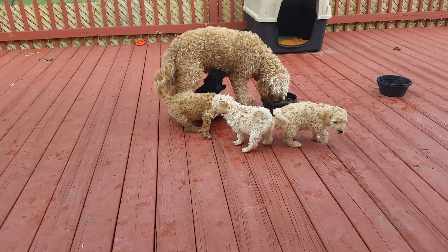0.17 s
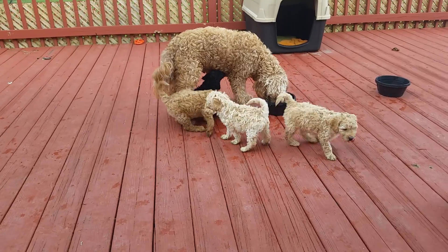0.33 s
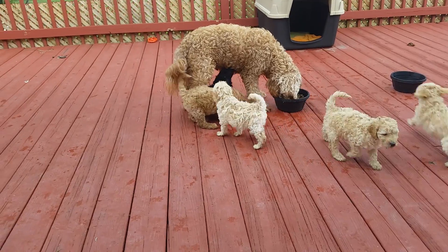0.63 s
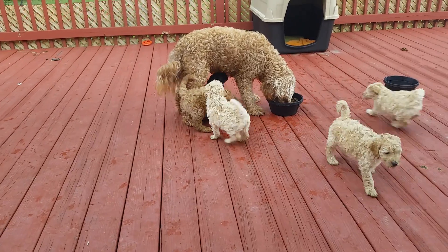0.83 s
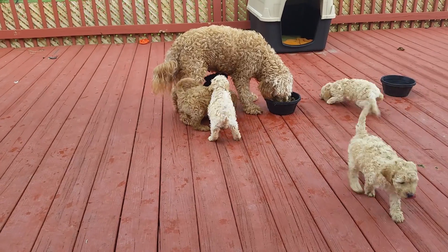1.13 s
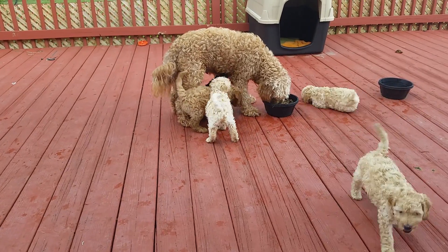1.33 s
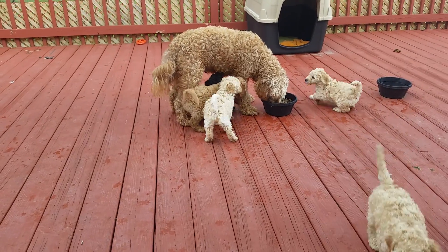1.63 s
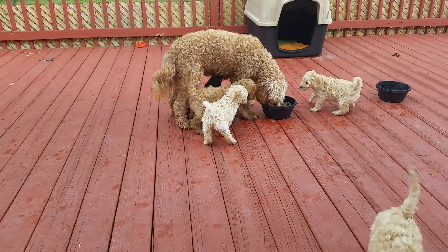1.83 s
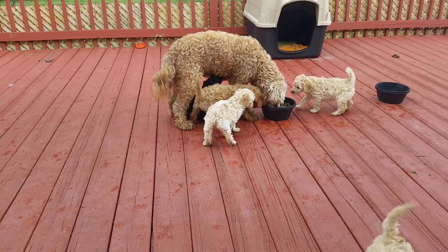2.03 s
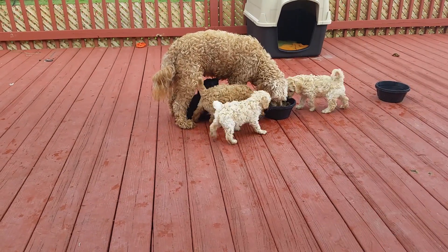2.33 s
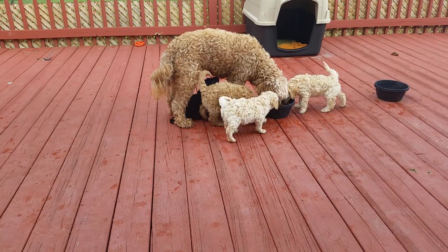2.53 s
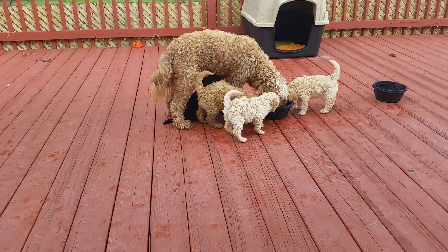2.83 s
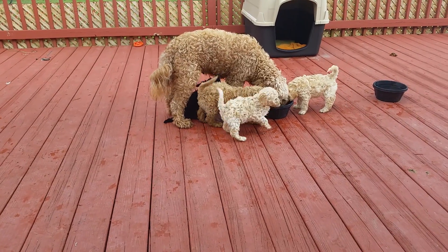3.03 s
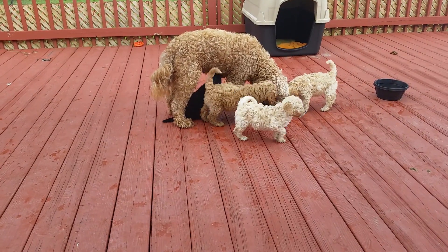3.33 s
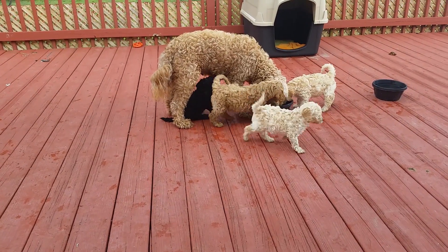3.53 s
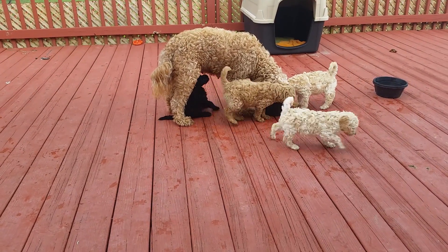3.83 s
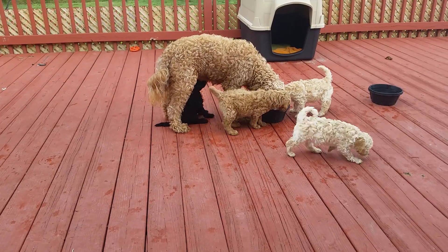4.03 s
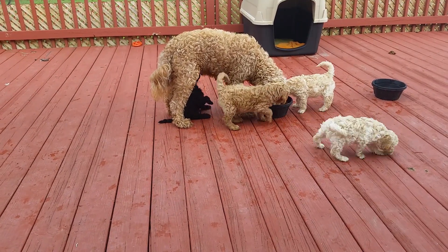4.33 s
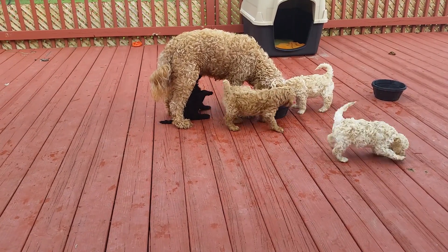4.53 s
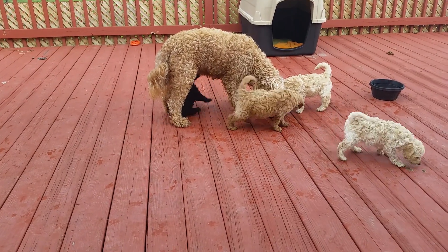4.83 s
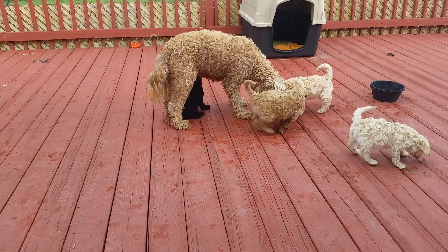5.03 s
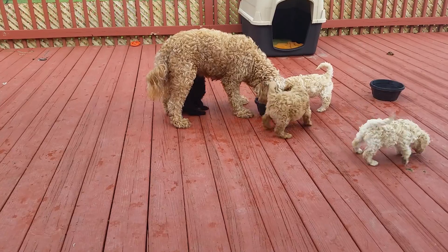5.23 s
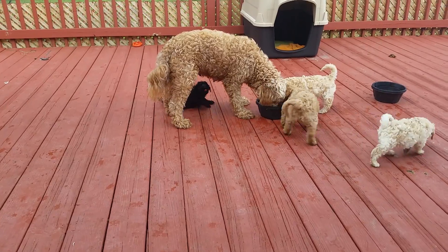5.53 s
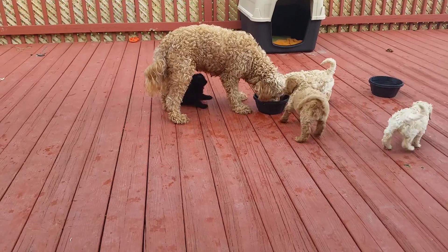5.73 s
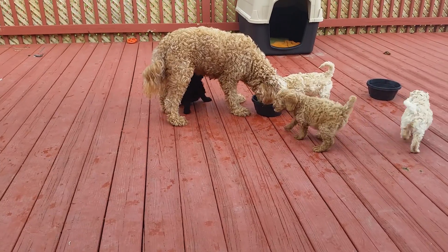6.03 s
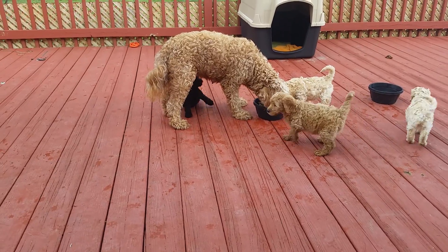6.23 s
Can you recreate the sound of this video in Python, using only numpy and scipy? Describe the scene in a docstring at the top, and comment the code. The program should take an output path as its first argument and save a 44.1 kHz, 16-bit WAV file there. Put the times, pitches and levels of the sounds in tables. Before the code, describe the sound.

Outdoors on a wooden deck, a litter jostles at a food bowl. Thin whistled squeaks, faint whimpers and dry clicks of claws and food come first, then one short raspy yelp midway. After a pause comes a louder, piercing double yelp, followed by soft hollow paw thumps and scuffs. A low lumpy rumble and faint hiss continue throughout. Stereo microphone nearby, right side duller, with light yard echoes.

```python
"""On a wooden deck outdoors, close to a food bowl, puppies jostle round their mother before a two-port microphone.
Sharp yelps and fainter whimpers are harmonic stacks shaped by throat and mouth; thin squeaks are near-pure whistles.
Paws ring the board modes, claws and food click in bursts of noise, and scuffs are swelling bands of grit.
Filtered noise makes the low outdoor rumble and faint hiss; far birds and one faint whine are smeared, gliding tones.
Echoes and a short scatter place the puppies' voices in the yard."""
import sys
import numpy as np
from scipy import signal
from scipy.fft import rfft, irfft
from scipy.io import wavfile
from scipy.ndimage import map_coordinates

SR = 44100
rng = np.random.default_rng(int(sys.argv[2]) if len(sys.argv) > 2 else 0)


def unload_wav(signal):
    """Save mono or channel-first audio to the path in sys.argv[1] as 16-bit WAV at rate SR, clipped to [-1, 1]."""
    wavfile.write(
        sys.argv[1],
        SR,
        np.round(np.clip(np.atleast_2d(signal).T, -1, 1) * 32767).astype(np.int16),
    )


N = 281700
TIME = np.arange(N) / SR   # s
FREQS = np.maximum(np.arange(N // 2 + 1) * SR / N, 1)   # Hz

# All levels below are relative; each source sets its own final trim.
# Low outdoor noise over time. Each row: time in seconds, level in dB.
RUMBLE_LEVEL = [(.25, -43.5), (.4, -45.5), (.9, -45), (2.9, -45), (3.9, -47), (4.55, -47), (4.8, -45),
                (5.3, -44), (6.39, -45)]
# Treble of the open air over time. Each row: time in seconds, hiss level in dB, top fizz level in dB.
TREBLE_LEVELS = [(0.1, -87.5, -87), (0.27, -63.5, -72.5), (0.5, -72, -77.5), (1.43, -76.5, -85),
                 (1.62, -77, -77), (2.52, -71, -78), (2.69, -76.5, -75.5), (3.3, -69.5, -75),
                 (3.72, -80, -84), (4.11, -70, -76.5), (4.36, -88.5, -88), (4.67, -89.5, -84),
                 (4.79, -70.5, -70.5), (5.37, -75, -79), (5.69, -66, -69), (6.11, -74.5, -75),
                 (6.32, -66.5, -64.5), (6.39, -63, -61.5)]
# Spectrum of the air in bass and middle. Each row: frequency in Hz, level in dB.
AIR_SPECTRUM = [(15, -43.5), (25, -15.5), (53, -1), (116, -3.5), (361, -15.5), (513, -20), (637, -21),
                (691, -20), (1930, -28.5), (2260, -26.5), (2970, -32), (4450, -30), (5670, -45),
                (7830, -32.5), (15800, -37)]
# Spectrum of the hiss. Each row: frequency in Hz, level in dB.
HISS_SPECTRUM = [(1760, -37), (3000, -0.5), (3450, -1.5), (3620, -6), (3930, -7), (4430, 0.5), (5650, -9.5),
                 (6400, -9), (7830, -3), (9060, -8), (13100, -2.5), (15200, -4), (15800, -31)]
# Likeness of the noise at the two ports. Each row: frequency in Hz, correlation from 0 to 1.
PORT_LIKENESS = [(60, 0.95), (130, 0.97), (290, 0.79), (640, 0.11), (1400, 0.021), (12000, 0.14)]
# Soft whimpers. Each row: start in seconds, length in seconds, start, middle and end pitch in Hz,
# level in dB, brightness in dB, mouth resonance in Hz, roughness (0 is steady).
WHIMPERS = [(0.071, 0.08, 905, 1017, 948, -50, 7.5, 1550, 0.42),
            (0.499, 0.051, 777, 818, 876, -56.5, 3, 1700, 0.3),
            (2.812, .085, 1037, 917, 840, -54.5, -3.5, 1000, 0.3),
            (2.944, .135, 837, 885, 718, -47, -15, 920, 0.11)]
# Three loud yelps, one curve each. Each row: time in seconds, pitch in Hz, level in dB,
# brightness in dB, mouth resonance in Hz, roughness (0 is steady).
YELPS = [
    [(3.323, 1018, -47, 6, 2000, 1), (3.331, 925, -37.5, 2.5, 2100, 0.48), (3.345, 963, -28, -5.5, 2300, 0),
     (3.36, 995, -34.5, 10.5, 2220, .45), (3.375, 1066, -19.5, -8.5, 2100, 0),
     (3.386, 1045, -31, 5.5, 2070, 0.36), (3.396, 983, -27.5, 2, 970, 0.58),
     (3.403, 922, -30.5, 3.5, 1830, 0.57), (3.416, 873, -45, 5, 1570, 1.2)],
    [(4.604, 1327, -26.5, -21, 1300, 0.25), (4.613, 1054, -38, -14, 1900, 0),
     (4.63, 1043, -28.5, 1.5, 4350, 0), (4.643, 1078, -27, -5, 1900, 0.03),
     (4.651, 1249, -15, -7.5, 1400, 0.05), (4.66, 1319, -12.5, -13, 1330, 0.08),
     (4.678, 1305, -23, -5, 1300, 0.26), (4.685, 1228, -33.5, -1.5, 1300, .73),
     (4.71, 1110, -33.5, -5.5, 1300, .8)],
    [(4.725, 1008, -32.5, -3, 3930, 0), (4.733, 982, -33.5, 8.5, 3770, 0.1),
     (4.762, 990, -31.5, 7, 4240, 0.17), (4.776, 1036, -23.5, 2, 2600, 0.05),
     (4.79, 1019, -32, -8, 2200, .15), (4.808, 1064, -25, -2.5, 1260, 0), (4.83, 1009, -37, -4, 1100, .28),
     (4.84, 900, -42, -15, 1260, 0.7), (4.862, 713, -48, -13, 1500, 0)],
]
# Throat colour of the cries. Each row: frequency in Hz, gain in dB.
THROAT = [(600, 3.5), (1000, -1.5), (1350, -2), (2050, -2), (2600, -11.5), (3350, -8), (3950, 0.5),
          (4600, -6), (5150, -10), (5600, -12), (6200, -14), (7000, -21), (7500, -28.5), (9500, -59.5),
          (12500, -28), (16000, -50)]
# House wall, kennel and fence. Each row: delay in seconds, level in dB.
ECHOES = [(0.0189, -4.5), (.034, -14), (.047, -21.5)]
# Cries from the bowl as they reach the right port. Each row: frequency in Hz, gain in dB.
CRY_RIGHT = [(1000, -3.5), (1300, 4), (1600, 1.5), (2000, 0), (3000, -4), (4000, -1), (6000, -7), (9000, 3)]
# Clearest clicks of claws and food. Each row: start in seconds, level in dB, centre in Hz.
CLICKS = [(.227, -47, 1960), (.2834, -46, 4080), (.3503, -39, 1890), (.646, -44, 1600), (.729, -41.5, 1280),
          (.7498, -47, 4300), (.8782, -45, 1400), (2.0348, -51.5, 4200), (2.1994, -48.5, 1300),
          (2.2854, -41, 3500), (2.2986, -47, 3550), (2.532, -42, 1250), (2.602, -55, 12000),
          (2.6095, -41, 1400), (2.6803, -50, 9900), (3.7357, -47.5, 1780), (4.272, -47.5, 1200),
          (5.0002, -44, 1180), (5.8592, -52, 1300), (6.0858, -40, 1500), (6.2654, -62, 11000)]
# Paws and fur brushing the boards. Each row: start in seconds, length in seconds, centre in Hz, level in dB.
SCUFFS = [(0.243, 0.055, 3000, -40), (0.621, 0.11, 1830, -47.5), (1.795, 0.095, 2670, -49),
          (2.436, 0.085, 3330, -47), (2.273, .038, 6650, -62), (2.862, 0.064, 12500, -52),
          (2.877, 0.052, 3200, -43), (3.072, .063, 3670, -50.5), (4.082, 0.051, 3130, -50.5),
          (5.045, .059, 395, -36.5), (5.169, 0.06, 565, -37.5), (5.596, 0.064, 880, -46.5),
          (5.656, 0.044, 3570, -48)]
# Whistled squeaks. Each row: start in seconds, length in seconds, start, middle and end pitch in Hz,
# level in dB.
SQUEAKS = [(0.321, 0.081, 2550, 2860, 2800, -45.5), (.515, 0.053, 1675, 1682, 1650, -39),
           (.765, 0.047, 2640, 2760, 2920, -56), (0.829, 0.055, 2314, 2530, 2830, -42.5),
           (0.883, 0.034, 2720, 2580, 2270, -42.5), (.95, 0.059, 2310, 2298, 2205, -45),
           (1.02, 0.09, 2240, 2140, 2140, -53), (1.21, 0.067, 3800, 3680, 3620, -53.5),
           (1.676, 0.058, 2970, 2910, 2780, -49), (1.706, 0.031, 2920, 2370, 2220, -47.5),
           (1.742, 0.069, 2130, 2050, 2100, -47), (1.801, 0.03, 2190, 2430, 2400, -43),
           (2.196, .045, 2830, 3370, 2950, -49.5), (2.25, 0.035, 2870, 3180, 3650, -45.5),
           (2.29, 0.14, 2720, 2443, 2205, -44.5), (2.418, 0.0407, 2390, 2506, 2200, -47.5),
           (4.86, 0.046, 2760, 2846, 2760, -39.5), (5.285, 0.039, 3680, 3600, 3530, -47.5),
           (5.346, 0.056, 2740, 2640, 2340, -54)]
# Paws landing on the boards. Each row: start in seconds, boom level in dB, knock level in dB.
PAWS = [(.352, -29.5, -38.5), (.378, -33.5, -52), (0.84, -47, -59), (4.999, -38, -33), (5.081, -33, -58),
        (5.131, -34.5, -30.5), (5.205, -36, -59), (5.331, -34.5, -45.5), (5.366, -31.5, -55),
        (5.483, -35, -47), (5.511, -35, -53), (5.772, -30.5, -41), (6.09, -37, -50.5)]
# Nominal deck modes. Each row: frequency in Hz, width in Hz, level in dB.
BOARD_MODES = [(125, 15.3, 2.5), (184, 17.8, 5), (250, 24.8, 5)]
# Far birds, and one faint whine near 2.2 kHz at 5.41 s. Each row: start in seconds, length in seconds,
# start and end pitch in Hz, smear rate in Hz, level in dB.
BIRDS_AND_WHINE = [(0.974, 0.32, 4600, 4510, 692, -61.5), (1.32, 0.27, 2410, 2190, 99, -64),
                   (3.784, 0.65, 4300, 4400, 126.7, -69), (4.111, .3, 2330, 2110, 69, -66.5),
                   (4.204, 0.18, 4530, 4800, 400, -68), (5.41, .2, 2200, 2230, 91, -62)]
# The duller right port. Each row: frequency in Hz, gain in dB.
RIGHT_SHADE = [(60, -4), (110, 4), (200, -4), (380, -2.5), (700, -4.5), (1300, -8), (2400, -7.5),
               (4400, -15), (6200, -19.5), (8100, -18.5), (11000, -4), (15000, 1)]

ONSET_DB, CREST_SHARE, ENDING_DB = -8.5, 0.56, -9   # every soft call swells to one crest and sinks again
CLICK_DB_PER_OCTAVE = 9   # every click weakens away from its centre
NIBBLE_DB, NIBBLE_SPREAD_DB, NIBBLE_HZ = -58.5, 4, 3000   # fainter clicks at random
SWELL_S, SWELL_DB = 0.24, 24   # rumble and middle rise at the start: over this time, by this much
PORT_LAG_S = 0.00012
CUTOFF_HZ = 15900


def from_db(db):
    """Decibels to gain."""
    return 10 ** (np.asarray(db) / 20)


def rms_one(x):
    """Scale to unit power."""
    return x / np.sqrt(np.mean(x ** 2) + 1e-20)


def curves(rows, t):
    """Each column of a table at the times t."""
    s, *columns = np.transpose(rows)
    return [np.interp(t, s, column) for column in columns]


def at_hz(points, hz):
    """Read a spectrum on a log-frequency axis."""
    f, value = np.transpose(points)
    return np.interp(np.log(hz), np.log(f), value)


def colour(x, spectrum):
    """Shape a signal by a spectrum in dB."""
    return irfft(rfft(x) * from_db(at_hz(spectrum, FREQS)), N)


def band(x, low_hz, high_hz, order=2):
    """Causal band-pass."""
    sos = signal.butter(order, [low_hz, high_hz], "band", fs=SR, output="sos")
    return signal.sosfilt(sos, x + 1e-18)


def drift(rate, size):
    """Smooth random wandering through unit-spread knots, rate of them a second."""
    knots = rng.standard_normal(int(size / SR * rate) + 4)
    return map_coordinates(knots, [np.arange(size) * rate / SR + 1], order=2)


def stereo_noise():
    """White noise, alike at both ports in the bass and nearly unrelated in the treble."""
    mid, side = rfft(rng.standard_normal((2, N)))
    alike = at_hz(PORT_LIKENESS, FREQS)
    return irfft(np.sqrt(1 + alike) * mid + np.sqrt(1 - alike) * side * [[1], [-1]], N)


def bursts(times, levels_db, t60, crack=0):
    """Envelope of sudden contacts: a brief crack on top of a dying tail."""
    out, t = np.zeros(N), np.arange(SR // 2) / SR
    shape = from_db(-60 * t / t60) + crack * np.exp(-t / 0.0025)
    for s, db in zip(times, levels_db):
        tail = out[int(s * SR):int(s * SR) + len(t)]
        tail += from_db(db) * shape[:len(tail)]
    return out


def background(rumble_db=2, middle_db=-7, hiss_db=-61.5, fizz_db=-70,
               hiss_follows=0.69, fizz_follows=0.9, lump_db=2, flicker_db=2.5):
    """A lumpy low rumble under a faint hiss that swells and sinks, all of it filtered noise."""
    low_db, = curves(RUMBLE_LEVEL, TIME)
    hiss_swing, fizz_swing = [db - db.mean() for db in curves(TREBLE_LEVELS, TIME)]
    rumble = rms_one(band(colour(stereo_noise(), AIR_SPECTRUM), 27, 377, order=3))
    middle = rms_one(band(colour(stereo_noise(), AIR_SPECTRUM), 386, 4240, order=3))
    out = rumble * from_db(rumble_db + lump_db * drift(23, N))
    out += middle * from_db(middle_db + flicker_db * drift(35, N))
    out *= from_db(low_db - SWELL_DB * np.clip(1 - TIME / SWELL_S, 0, 1))

    treble = colour(stereo_noise(), HISS_SPECTRUM)
    hiss = rms_one(band(treble, 3250, 8570, order=5))
    fizz = rms_one(band(treble, 9470, 17000, order=4))
    flicker = flicker_db * drift(50, N)   # hiss and fizz flicker together
    out += hiss * from_db(hiss_db + hiss_follows * hiss_swing + flicker)
    out += fizz * from_db(fizz_db + fizz_follows * fizz_swing + flicker)
    return out


def span(start_s, end_s):
    """Samples of one call, and a gate with 2 ms soft ends."""
    i = np.arange(int(start_s * SR), int(end_s * SR))
    return i, np.clip(np.minimum(i - i[0], i[-1] - i) / (0.002 * SR), 0, 1)


def soft_call(s, length, start_hz, middle_hz, end_hz, db):
    """A short call bends through three pitches while it swells and sinks: samples, gate, pitch, level."""
    i, gate = span(s, s + length)
    along = np.linspace(0, 1, len(i))
    pitch = np.polyval(np.polyfit([0, 0.5, 1], [start_hz, middle_hz, end_hz], 2), along)
    rising_db = ONSET_DB * (1 - along / CREST_SHARE) ** 2
    sinking_db = ENDING_DB * ((along - CREST_SHARE) / (1 - CREST_SHARE)) ** 2
    return i, gate, pitch, db + np.where(along < CREST_SHARE, rising_db, sinking_db)


def cry_controls():
    """For each yelp and whimper: samples, gate, pitch, level, brightness, mouth resonance, roughness."""
    for rows in YELPS:
        i, gate = span(rows[0][0], rows[-1][0])
        yield i, gate, *curves(rows, i / SR)
    for *call, bright_db, mouth_hz, rough in WHIMPERS:
        yield *soft_call(*call), bright_db, mouth_hz, rough


def cries(jitter=0.039, shimmer=0.94, mouth_db=7, mouth_width_hz=300, rasp_db=-7, fray=0.1):
    """Vocal folds sound a harmonic stack through throat and mouth; strain makes it unsteady and raspy."""
    voice, rasp = np.zeros((2, N))
    for i, gate, pitch, level_db, bright_db, mouth_hz, rough in cry_controls():
        pitch = pitch * (1 + jitter * rough * drift(350, len(i)))
        phase = 2 * np.pi * np.cumsum(pitch) / SR
        for k in range(1, 15):
            hz = k * pitch
            mouth = mouth_db / (1 + ((hz - mouth_hz) / mouth_width_hz) ** 2)
            press = bright_db * np.clip((hz - 1400) / 2000, 0, 1)   # positive brightness lifts upper harmonics
            gain = from_db(level_db + at_hz(THROAT, hz) + mouth + press)
            gain = gain * (1 + shimmer * rough * drift(321.5, len(i)))
            slip = fray * k * rough * drift(600, len(i))   # uneven closures blur the high harmonics most
            voice[i] += np.sqrt(2) * gate * gain * np.sin(k * phase + slip)
        rasp_gain = from_db(level_db + bright_db * 0.81 + rasp_db)
        rasp[i] += gate * rough * rasp_gain * (1 + np.cos(phase))   # breath pulses once a cycle
    breath = rms_one(band(colour(rng.standard_normal(N), THROAT), 1200, 15000))
    return voice + rasp * breath


def yard(x, tail_db, tail_t60, echo_db):
    """Walls return a few echoes, the railing a short scatter."""
    t = np.arange(SR // 2) / SR
    decay = from_db(-60 * t / tail_t60) * np.clip(t / 0.0024, 0, 1)
    scatter = rng.standard_normal((2, len(t))) * decay
    response = from_db(tail_db) * scatter / np.sqrt(np.sum(scatter[0] ** 2))
    for delay, db in ECHOES:
        response[0, int(delay * SR)] += from_db(db + echo_db)
        response[1, int((delay + 0.0003) * SR)] += from_db(db + echo_db)   # right port a little later
    return x + signal.fftconvolve(x[None], response, axes=1)[:, :N]


def nibbles(count):
    """Faint clicks scattered at random, within an octave of their centre: rows as in CLICKS."""
    when, size, pitch = rng.random((count, 3)).T
    level_db = NIBBLE_DB + NIBBLE_SPREAD_DB * (2 * size - 1)
    return np.column_stack([when * TIME[-1], level_db, NIBBLE_HZ * 2 ** (2 * pitch - 1)])


def clicks(low_db=1, middle_db=2, high_db=1, top_db=1, grain_db=4):
    """Claws and food crackle against wood and bowl in short gritty bursts; the treble dies soonest."""
    s, db, centre_hz = np.vstack([CLICKS, nibbles(count=12)]).T
    out, noise = 0, stereo_noise()
    # Each row: low edge in Hz, high edge in Hz, trim in dB, decay by 60 dB in seconds.
    bands = [(812, 1960, low_db, 0.068), (2260, 5800, middle_db, 0.11),
             (5530, 8000, high_db, 0.045), (11000, 17300, top_db, 0.023)]
    for low_hz, high_hz, band_db, t60 in bands:
        octaves = np.abs(np.log2(np.sqrt(low_hz * high_hz) / centre_hz))
        envelope = bursts(s, db + band_db - CLICK_DB_PER_OCTAVE * octaves, t60, crack=1.0)
        out = out + rms_one(band(noise, low_hz, high_hz)) * envelope
    return out * rms_one(from_db(grain_db * drift(700, N)))


def scuffs(grain_db=3.5, spread=1.56):
    """Paws and fur rub the boards: short gritty swishes that swell and fade."""
    out = np.zeros((2, N))
    for s, length, centre_hz, db in SCUFFS:
        i = np.arange(int(s * SR), int((s + length) * SR))
        grit = rng.standard_normal((2, len(i))) * from_db(grain_db * drift(400, len(i)))
        swish = rms_one(band(grit, centre_hz / spread, centre_hz * spread))
        out[:, i] += from_db(db) * swish * np.hanning(len(i))
    return out


def squeaks(waver=0.014, flutter_db=2.5, fray=0.44):
    """Nearly pure whistles that waver, and fray into breathy noise where they glide fast."""
    out = np.zeros(N)
    for call in SQUEAKS:
        i, gate, pitch, db = soft_call(*call)
        glide = np.abs(np.gradient(np.log(pitch))) * SR
        unsteady = np.clip(glide / 4, 0.15, 1)
        pitch = pitch * (1 + waver * unsteady * drift(338, len(i)))
        phase = 2 * np.pi * np.cumsum(pitch) / SR
        breath = drift(937, len(i)) * np.sin(phase) + drift(910, len(i)) * np.cos(phase)
        level = from_db(db + flutter_db * drift(126, len(i)))
        out[i] += gate * level * (np.sin(phase) + fray * unsteady * breath)
    return out


def paws(knock_db=10, knock_hz=430, knock_decay_s=0.00092, rattle_db=-14, rattle_t60=0.085):
    """A paw gives one soft knock, then the boards boom in their modes and rattle."""
    s, boom, knock = np.transpose(PAWS)
    out, t = np.zeros(N), np.arange(SR // 4) / SR
    push = t / knock_decay_s * np.exp(1 - t / knock_decay_s)
    for at, boom_level, knock_level in zip(s, boom, knock):
        ring = 0
        for hz, width_hz, db in BOARD_MODES:
            mode_hz = hz * (1 + 0.086 * rng.standard_normal())   # each landing detunes the modes
            ring = ring + from_db(db) * np.exp(-np.pi * width_hz * t) * np.sin(2 * np.pi * mode_hz * t)
        thud_hz = knock_hz * (1 + 0.096 * rng.standard_normal())
        thud = push * np.sin(2 * np.pi * thud_hz * t)
        step = from_db(boom_level) * ring * (1 - np.exp(-t / 0.0047))
        step += from_db(knock_level + knock_db) * thud
        tail = out[int(at * SR):int(at * SR) + len(t)]
        tail += step[:len(tail)]
    rattle = rms_one(band(stereo_noise(), 290, 620))
    return out + rattle * bursts(s, knock + knock_db + rattle_db, rattle_t60)


def birds_and_whine(level_db):
    """Far bird calls, smeared by distance, and one faint whine: each a soft narrow band of sound."""
    out = np.zeros((2, N))
    for s, length, start_hz, end_hz, width_hz, db in BIRDS_AND_WHINE:
        i = np.arange(int(s * SR), min(int((s + length) * SR), N))
        phase = 2 * np.pi * np.cumsum(np.linspace(start_hz, end_hz, len(i))) / SR
        for port in out:
            smear = drift(width_hz, len(i)) * np.sin(phase) + drift(width_hz, len(i)) * np.cos(phase)
            port[i] += from_db(db + level_db) * smear * np.hanning(len(i)) ** 0.5
    return out


def scene():
    """Puppies, their feet and the open air at the two ports."""
    left, right = yard(cries(), tail_db=-12, tail_t60=0.3, echo_db=-4)
    right = np.interp(TIME - PORT_LAG_S, TIME, colour(right, CRY_RIGHT))   # cries reach the left port first
    voices = np.array([left, right])
    whistles = yard(squeaks(), tail_db=-10, tail_t60=0.3, echo_db=1)
    whistles = whistles * from_db([[-1], [3]])   # lifted at the right port
    return background() + voices + clicks() + scuffs() + whistles + paws() + birds_and_whine(level_db=7)


def record(dry):
    """The right port is muffled; the recorder fades in and cuts the top."""
    ports = np.array([dry[0], colour(dry[1], RIGHT_SHADE)])
    fade = np.clip((TIME - 0.03) / 0.024, 0, 1) ** 2
    top_cut = signal.ellip(10, 0.1, 80, CUTOFF_HZ, fs=SR, output="sos")
    return signal.sosfilt(top_cut, ports * fade)


dry = scene()
out = record(dry)
unload_wav(out)
```